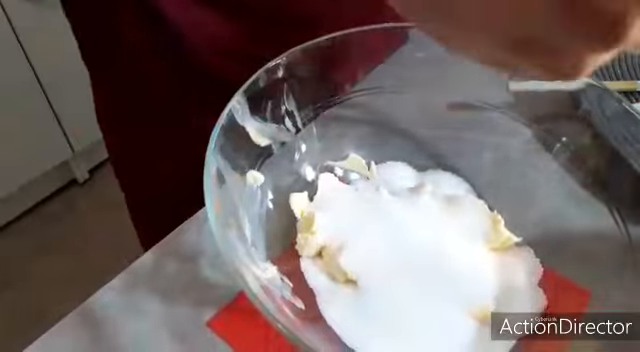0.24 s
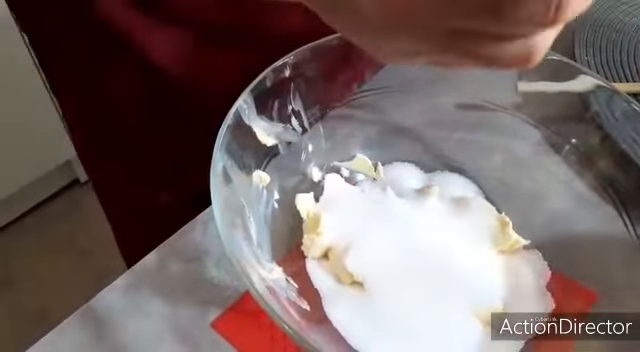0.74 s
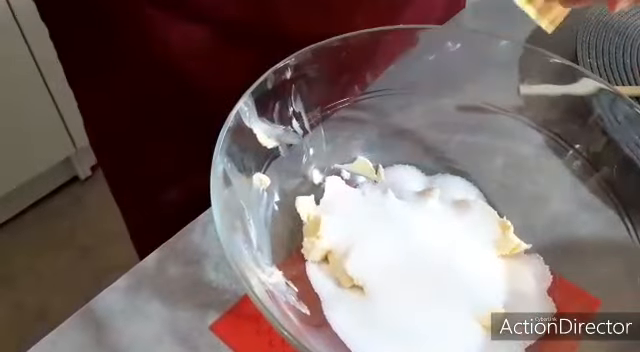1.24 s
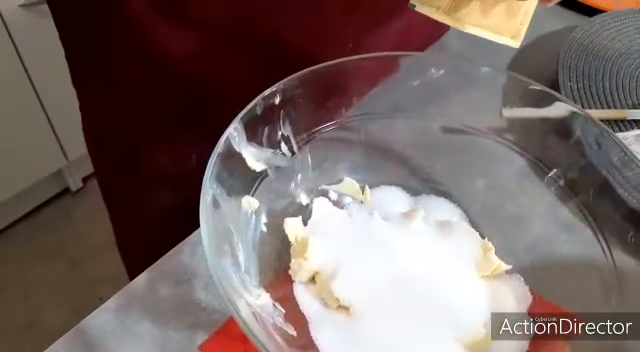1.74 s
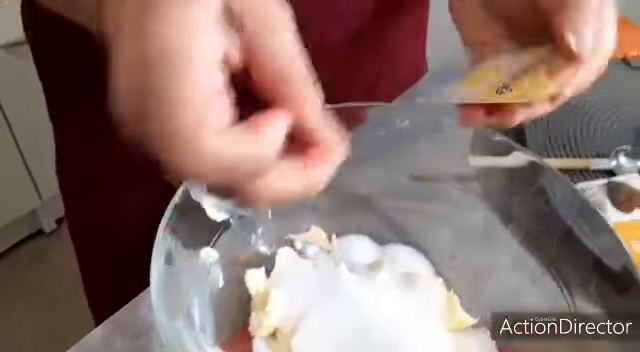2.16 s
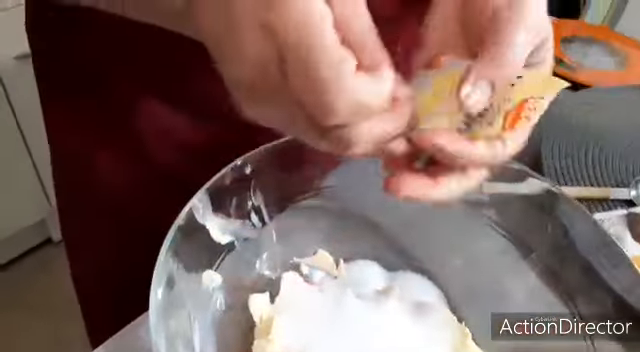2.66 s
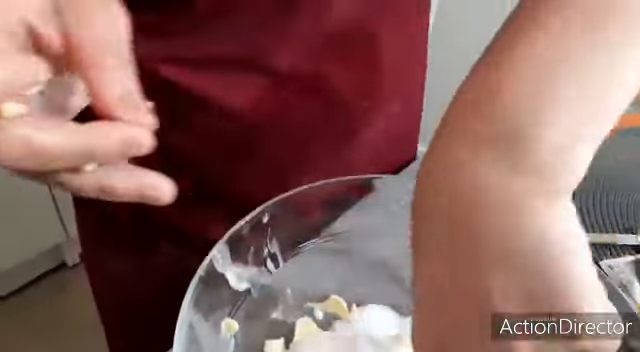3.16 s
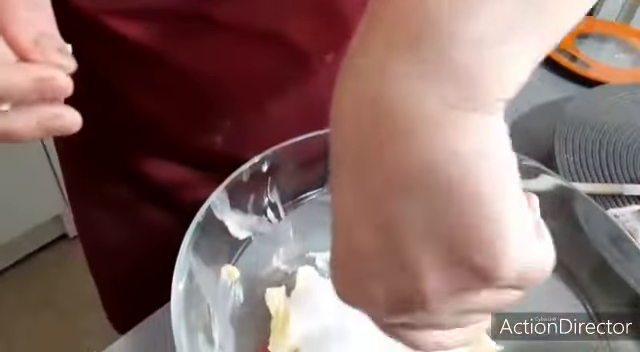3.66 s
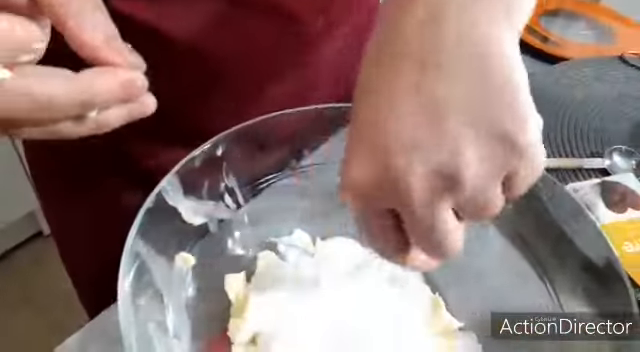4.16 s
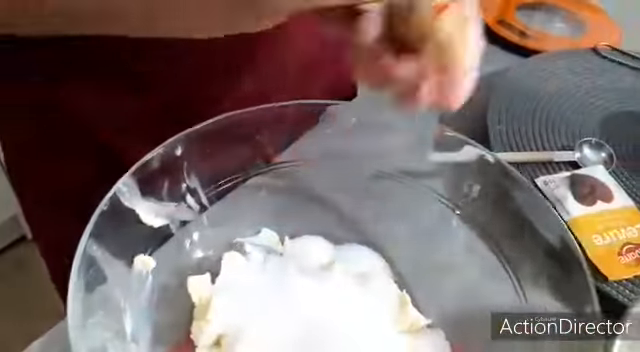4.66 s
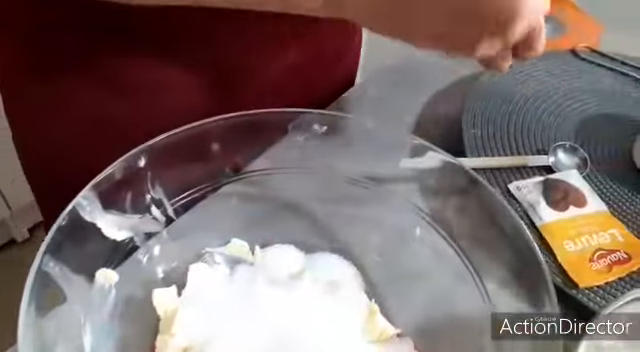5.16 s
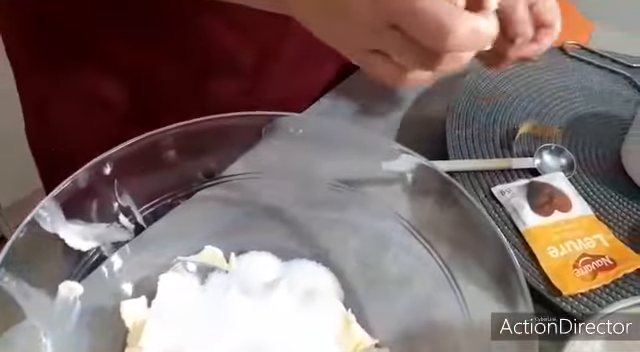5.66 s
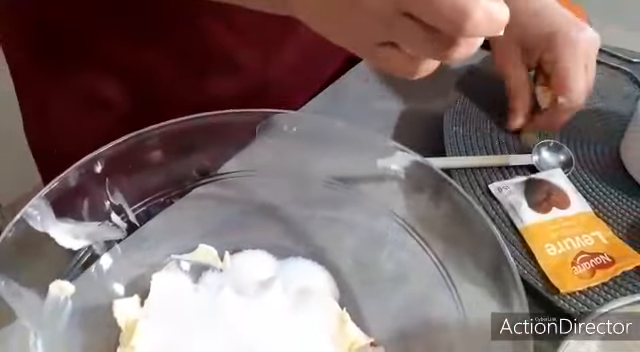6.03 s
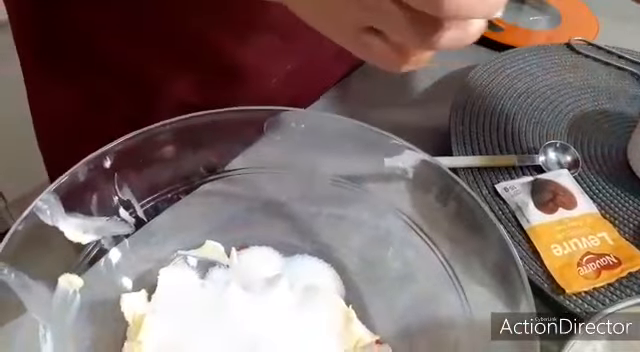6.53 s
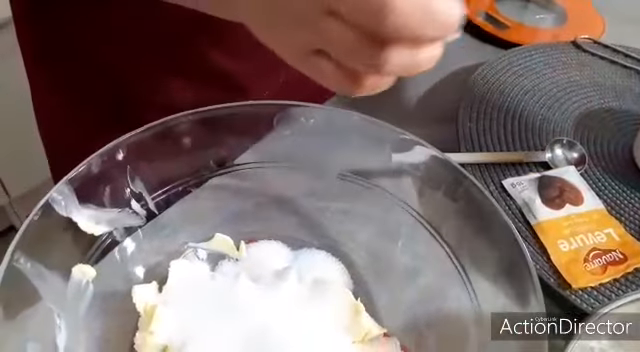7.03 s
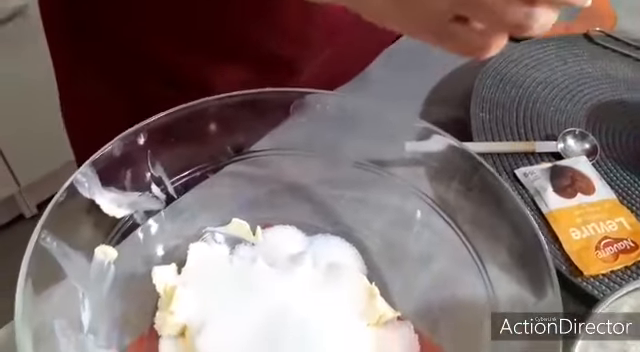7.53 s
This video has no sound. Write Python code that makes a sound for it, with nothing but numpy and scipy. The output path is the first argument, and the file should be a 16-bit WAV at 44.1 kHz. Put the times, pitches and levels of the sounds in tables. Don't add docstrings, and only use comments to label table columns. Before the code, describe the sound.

Sparse crisp snaps and a short tear open the scene, shifting toward the right. Sharper crackles and a grainy pouring rustle come back to centre, with small muted taps on a glass bowl. The loudest crumpling follows, then a lull, then another tight, bright crackling burst that thins to isolated ticks. Recorded a hand's width away in a small, quiet kitchen with faint hum.

```python
import sys
import numpy as np
from scipy import signal
from scipy.fft import rfft, irfft, next_fast_len
from scipy.io import wavfile
from scipy.ndimage import uniform_filter1d

SR = 44100
rng = np.random.default_rng(int(sys.argv[2]) if len(sys.argv) > 2 else 0)


def voltage_ratio(level):
    return 10 ** (np.asarray(level, float) / 20)


def digitize_waveform(pressure):
    field = np.atleast_2d(pressure).T
    bounded = np.clip(field, -1, 1)
    quanta = np.round(bounded * 32767).astype(np.int16)
    wavfile.write(sys.argv[1], SR, quanta)


N = 344024

TURN_SNAPS = [(.0063, -21.5, 2950, -6), (.0553, -25, 4640, -10), (.1524, -25.5, 1780, -2),
              (.2265, -30.5, 5860, 1), (.2785, -22, 1870, 1.5), (.2848, -17.5, 3100, -2.5),
              (.3513, -23.5, 3180, -.5), (.5069, -27.5, 6700, -13), (.5269, -25, 1670, .5),
              (.5847, -29, 2470, -2), (.8267, -39, 1820, -16.5), (.9764, -38, 2160, 2),
              (.994, -26, 7400, -1), (1.2095, -36, 1770, -11), (1.2995, -27, 2250, 3),
              (1.31, -19, 6850, -4), (1.3796, -33.5, 1750, -17.5), (1.4246, -42, 4650, 6),
              (1.4774, -29, 1850, 6), (1.6157, -32, 4670, 1.5), (1.7893, -26, 1060, .5),
              (1.924, -21.5, 5400, -9), (1.9393, -20, 8300, 1.5), (2.0069, -18.5, 1890, 3),
              (2.1817, -46.5, 1700, -21)]
POUR_SNAPS = [(2.6147, -16.5, 5900, 1), (2.697, -15, 3800, 1.5), (2.7272, -26, 2000, -10),
              (2.87, -31.5, 1940, -23), (2.8967, -27, 1890, -9), (3.022, -19, 7600, -4.5),
              (3.3246, -20, 2670, -16), (3.4036, -19.5, 1830, .5), (3.422, -12, 1860, -21),
              (3.429, -12, 1960, -1), (3.4904, -12.5, 2860, -3.5), (3.5096, -22, 1500, -6),
              (3.5296, -14, 1420, -10.5), (3.5635, -18, 1670, -3.5), (3.8565, -34.5, 2800, -7.5),
              (3.9879, -20, 5400, -7), (4.0894, -20.5, 2570, -3.5), (4.1016, -15.5, 1690, -8),
              (4.1154, -11.5, 4340, 5), (4.1966, -9, 7600, 6), (4.2214, -9, 7040, -2),
              (4.2266, -20, 1060, 0), (4.4056, -29, 4540, -7)]
CRUSH_SNAPS = [(4.4288, -15.5, 7860, -3), (4.4459, -12, 4430, -3), (4.514, -19, 1310, 1),
               (4.5248, -15, 5700, -4.5), (4.5468, -15, 3000, -4), (4.588, -21, 1240, -10),
               (4.6023, -23, 6400, 7), (4.6086, -17.5, 7600, -2), (4.6663, -13, 3480, -12),
               (4.6935, -20.5, 4630, -17.5), (4.7062, -9.5, 3440, -13), (4.715, -11, 3550, -8),
               (4.7628, -23, 8120, 11), (4.7721, -12.5, 8000, .5), (4.7793, -13, 5000, 3.5),
               (4.8068, -18, 2800, -20), (4.8429, -8.5, 7500, -3), (4.8522, -19.5, 7560, 8.5),
               (4.9018, -26, 1390, -2), (4.9223, -19.5, 5810, -12), (4.9399, -16, 3570, -2.5),
               (5.0399, -16, 1990, 5.5), (5.0906, -29, 1510, 7.5), (5.1265, -22, 1590, -21),
               (5.5022, -38.5, 2580, -2.5), (5.6616, -22, 7000, 1.5), (5.7225, -23, 1730, -24),
               (5.7451, -18.5, 1900, -.5), (5.7652, -23, 2024, 6), (5.7939, -17.5, 2420, 9)]
BALL_SNAPS = [(5.8146, -14, 5600, -6), (5.8667, -12, 5400, -8), (5.8895, -24.5, 5360, -3),
              (5.9507, -33.5, 3880, -3.5), (6.0793, -28, 7240, -8.5), (6.2335, -32, 3980, -20),
              (6.2672, -15.5, 4580, -15.5), (6.3246, -28, 5360, -4), (6.3412, -24, 6680, -14),
              (6.3796, -21, 7900, 3), (6.4726, -9.5, 4130, -.5), (6.5408, -11, 4630, -9.5),
              (6.5448, -5, 6600, -9.5), (6.570, -27, 4800, -17), (6.6359, -28, 4900, -5),
              (6.6495, -29, 4930, -7), (6.6745, -14.5, 4030, -16), (6.6898, -22.5, 1940, -4),
              (6.696, -13, 4850, -2.5), (6.726, -20.5, 6900, -4.5), (6.7781, -27, 9200, 3),
              (6.8248, -15, 2460, -14), (6.8885, -11.5, 2570, -10), (6.9211, -33.5, 7150, 16),
              (7.2412, -29.5, 3680, -32.5), (7.3493, -25, 3360, -7.5), (7.4552, -35.5, 3730, -13),
              (7.708, -41.5, 3800, 2), (7.721, -31, 5730, -2), (7.7436, -23, 2490, -19.5)]
TICKS = [(0.0461, -28, 3900, -6), (0.146, -42, 3510, 3), (0.2512, -36, 4410, -6),
         (0.3161, -23, 8830, 0), (0.3365, -25, 8380, -1), (0.3451, -24, 8230, 0),
         (0.4058, -39, 7880, -3), (0.4906, -36, 5250, -8), (0.6687, -48, 1550, -18),
         (0.697, -37, 2410, -4), (0.7247, -30, 4090, -5), (0.8549, -40, 1830, -19),
         (0.8994, -45, 2800, 4), (0.9212, -39, 2520, -5), (1.3954, -42, 1010, -18),
         (1.4321, -38, 1830, -9), (1.4653, -48, 2090, 0), (1.5021, -40, 1100, -19),
         (1.5143, -40, 2200, -21), (1.8881, -43, 2200, 1), (2.1338, -42, 1890, -24),
         (2.264, -52, 7990, 5), (2.2946, -53, 1250, -12), (2.4012, -33, 8680, -1),
         (2.4115, -32, 8760, -2), (2.4358, -42, 2820, 1), (2.4706, -26, 4970, -12),
         (2.4998, -41, 1180, -14), (2.5223, -27, 2840, -12), (2.5339, -30, 7520, -1),
         (2.5419, -33, 5770, -3), (2.5718, -31, 8010, -2), (2.6078, -26, 4460, 1),
         (2.668, -24, 3080, -11), (2.6849, -23, 1960, -19), (2.706, -23, 3960, -11),
         (2.8643, -35, 1920, -19), (2.8899, -34, 1830, -13), (2.9064, -23, 1870, -21),
         (2.9684, -34, 1400, -13), (2.9752, -29, 1290, -11), (2.9948, -34, 3620, -8),
         (3.0493, -33, 3550, -11),
         (3.9998, -30, 4870, 1), (4.0101, -38, 2800, 4), (4.0785, -26, 1420, -24),
               (4.1806, -32, 2130, -22), (4.2334, -20, 6070, -1), (4.3885, -35, 1790, -22),
               (4.4989, -25, 5620, -4), (4.6797, -23, 1010, -13), (4.7188, -19, 1360, 0),
               (4.7402, -27, 1250, -20), (4.8033, -23, 7410, -4), (4.8365, -26, 1790, 4),
               (4.8593, -19, 2410, 0), (4.8751, -24, 3510, 2), (4.915, -21, 3010, -8),
               (4.9365, -17, 1680, -9), (5.0201, -34, 1530, -17), (5.0284, -33, 7600, 0),
               (5.2073, -25, 3380, -15), (5.4442, -41, 2390, -21), (5.5843, -45, 1770, -15),
               (5.6199, -39, 1960, -20), (5.646, -31, 1920, -24), (5.7048, -38, 4570, 7),
               (5.748, -23, 2430, 7), (6.1409, -44, 4290, -3), (6.255, -33, 4950, -13),
               (6.3186, -35, 3380, -12), (6.3325, -30, 2150, -9), (6.3588, -38, 6350, 5),
               (6.3681, -29, 6780, -5), (6.3908, -32, 6760, -16), (6.453, -23, 7490, -8),
               (6.4764, -18, 4220, -11), (6.6669, -27, 4570, -13), (6.6806, -31, 3880, -24),
               (6.7066, -23, 5020, -8), (6.7586, -30, 3750, -2), (6.8303, -22, 5560, -13),
               (6.8977, -29, 4890, -9), (6.9097, -29, 8030, -5), (7.6513, -49, 5790, -1)]
# [low edge f/Hz, high edge f/Hz]
BANDS = [(350, 1250), (1250, 3000), (3000, 8000), (8000, 15600)]


def sachet():
    shape, rings = snaps(TURN_SNAPS + POUR_SNAPS + CRUSH_SNAPS + BALL_SNAPS)
    tick_shape, tick_rings = snaps(TICKS)
    rub = rustle()
    noise = paper_noise()
    rings = rings + crackle(uniform_filter1d(rub[1, 0] + rub[2, 0], size=300))
    shape = shape + voltage_ratio(-4) * tick_shape
    rings = rings + voltage_ratio(-1.5) * tick_rings

    bands = np.zeros((2, N))
    for gated, (low, high) in zip((shape + rub) * noise, BANDS):
        bands += keep(gated, (.85 * low, 1.06 * high), order=2)

    rumble = rng.standard_normal((2, N)) + rng.standard_normal(N)
    rumble = unit(keep(rumble, (60, 240), order=2))
    push = uniform_filter1d(rub[0] + .15 * shape[0], size=900)
    return bands + keep(rings, (1000, 16000)) + voltage_ratio(-17.5) * push * rumble


# [t/s, closed 0-1]
CLOSED = [(0, .1), (.7, .35), (1.12, .8), (1.22, .2), (1.55, .45), (2.0, .02), (2.5, .15), (2.7, .55),
          (3.0, .25), (3.33, .65), (3.45, .22), (3.97, .75), (4.06, .24), (4.7, .38), (5.1, .95),
          (6.85, .75), (7.66, .99), (7.72, .2)]
# [t/s, broad panels against tight creases level/dB, graininess 0-1]
GRIP = [(0, 2, .7), (.85, 5, .9), (1.6, -2, .8), (1.9, 9, .5), (2.05, 1.5, .5), (2.8, -2, .8), (3.0, 6, .7),
        (3.25, -7, .12), (3.5, 4, .7), (4.5, -3, .9), (5.25, 13, .4), (6.3, 0, .8), (6.62, -6, .9),
        (6.9, 6, .6), (7.13, -11, .25), (7.3, -9, .4), (7.68, -4, .4), (7.75, 4, .8)]


def snaps(creases):
    shape, rings, t = np.zeros((4, 2, N)), np.zeros((2, N)), np.arange(2000) / SR
    rise = 1 - np.exp(-t / 0.00038)
    burst = np.array([rise * (fade(t, t60) + 0.045 * fade(t, 0.081)) for t60 in (0.013, 0.012, 0.010, 0.0052)])
    closed_s, closed = np.transpose(CLOSED)
    grip_s, grip_db, _ = np.transpose(GRIP)
    for (s, db, hz, fine_db), luck in zip(creases, rng.random((len(creases), 5))):
        start, shift, spacing, offset, side = luck
        gain = voltage_ratio(db) * ports(7.6 * (side - .5))[:, None]
        octaves = np.log2(hz / 3000)
        low_db = -4 * octaves - 32 * np.interp(s, closed_s, closed)
        lean_db = 3.5 * octaves
        panel_db = -9.5 - lean_db + .6 * np.interp(s, grip_s, grip_db)
        band_db = np.array([low_db - 2.5, panel_db, -6.5 + min(lean_db, 0), fine_db - 0.5])
        add(shape, voltage_ratio(band_db)[:, None, None] * gain * burst[:, None], s)

        phase = 2 * np.pi * np.array([[start], [start + (shift - .5) / 2]])
        second_hz = hz * (1.15 + .5 * spacing)
        pair = np.sin(2 * np.pi * hz * t + phase)
        pair = pair + .5 * np.sin(2 * np.pi * second_hz * t + phase + 2 * np.pi * offset)
        ring = fade(t, .48 / np.sqrt(hz))
        add(rings, voltage_ratio(-1.5) * gain * rise * ring * pair, s)
    return shape, rings


def crackle(loudness, count=2600, size=224):
    when, pitch, ring, side, phase, strength = rng.random((count, 6)).T
    start = (when * (N - size)).astype(int)
    panel_db, grain = (column[start] for column in read(GRIP))
    hz = (1400 * 10 ** (pitch ** voltage_ratio(.5 * panel_db)))[:, None]
    t = np.arange(size) / SR
    gain = loudness[start] * grain * voltage_ratio(5 - 13 * np.log10(np.maximum(strength, .15)))
    t60 = (3.8 + 9 * ring[:, None]) / hz
    tick = np.sin(2 * np.pi * (hz * t + phase[:, None]))
    tick = tick * (1 - np.exp(-t / 0.00023)) * fade(t, t60)
    where = (start[:, None] + np.arange(size)).ravel()
    heard = []
    for port_gain in ports(17 * (side - .5)):
        heard.append(np.bincount(where, (tick * (gain * port_gain)[:, None]).ravel(), N))
    return np.array(heard)


def rustle():
    effort = movement()
    low_db = -25 * read(CLOSED)[0] - .42 * (20 * np.log10(effort) + 52)
    fine_db = read([(3.4, 2), (3.45, -7.5), (7.02, -7.5), (7.08, -2.5)])[0]
    panel_db, grain = read(GRIP)
    common = effort * grains(90, 2.5, .06, .3 * grain)
    own = [grains(rate, 3.2, 5.5 / rate, 0.83 * grain) for rate in (152, 203, 252, 328)]
    band_db = [low_db - 1, panel_db / 2 - 6.5, -panel_db / 2 - 1, fine_db - .3 * panel_db]
    return np.array([voltage_ratio(db) * common * g for db, g in zip(band_db, own)])[:, None]


# [peak t/s, rustle level/dB, swell/s per 20 dB, fade/s per 20 dB]
STROKES = [(0.0, -52, .1, .5), (.299, -42, .04, .12), (.725, -47.5, .06, .09), (.05, -47, .008, .09),
           (.8, -57, .1, .2), (.9, -54, .03, .11), (1.06, -62, .1, .2), (4.7, -36, .06, .08),
           (5.66, -52, .01, .08), (2.67, -44, .02, .03), (7.51, -62, .01, .12), (.99, -51, .08, .11),
           (1.63, -67, .045, .1), (2.111, -66, .02, .14), (2.27, -68, .012, .3), (2.525, -47, .015, .08),
           (2.612, -37, .04, .07), (2.7, -40, .06, .07), (2.89, -49, .22, .4), (3.519, -40.5, .07, .09),
           (3.87, -61, .056, .12), (4.001, -45.5, .025, .13), (4.109, -26.5, .03, .04),
           (4.221, -32, .02, .06), (4.931, -34, .3, .085), (5.05, -37.5, .05, .075), (5.23, -41, .045, .2),
           (5.385, -52.5, .08, .07), (5.811, -41.5, .245, .155), (6.69, -42, .065, .062),
           (6.825, -43, .06, .05), (6.909, -46, .022, .095), (7.145, -58, .015, .1),
           (7.35, -48.5, .05, .085), (7.66, -58, .07, .06), (7.74, -45.5, .03, .16)]
# [t/s, rustle level/dB, swell/s per 20 dB, fade/s per 20 dB, hold/s]
DRAGS = [
    (.49, -53, .005, .05, .14),
    (1.22, -67, .19, .11, .28),
    (1.8, -55.5, .021, .3, .08),
    (1.925, -32, .025, .04, .14),
    (2.401, -53, .004, .11, .09),
    (3.171, -46.5, .25, .15, .14),
    (4.28, -51, .05, .21, .11),
    (4.52, -41.5, .25, .21, .26),
    (6.47, -44.5, .36, .11, .09),
    (7.42, -66, .21, .11, .21),
]


def movement():
    t, power = np.arange(0, N, 32) / SR, 1e-12
    for s, db, swell, fall, *hold in STROKES + DRAGS:
        before = (s - t) / swell
        after = (t - s - sum(hold)) / fall
        away = np.maximum(np.maximum(before, after), 0)
        power = power + voltage_ratio(db - 20 * away) ** 2
    return np.interp(np.arange(N) / SR, t, np.sqrt(power))


def grains(rate, spread_db, t60, share):
    chance = rng.random(N)
    size = np.minimum(rng.exponential(size=N), 2.2)
    slips = (chance < rate / SR) * voltage_ratio(spread_db * size)
    rough = unit(signal.lfilter([1], [1, -fade(1 / SR, t60)], slips))
    return np.sqrt(1 - share + share * rough ** 2)


ALIKE = [0.83, .5, 0.41, .1]
# [f/Hz, level/dB per Hz]
PAPER = [(120, -40), (200, -14.5), (335, -11.5), (562, -19.5), (640, -12.5), (860, -14), (1830, 1),
         (10400, 3), (12300, 4), (15200, 5), (16200, -40)]


def paper_noise():
    out = []
    for edges, alike in zip(BANDS, ALIKE):
        shared, own = rng.standard_normal(N), rng.standard_normal((2, N))
        mixed = np.sqrt(alike) * shared + np.sqrt(1 - alike) * own
        out.append(unit(keep(colour(mixed, PAPER), edges)))
    noise = np.array(out)
    drumming = signal.lfilter(*signal.iirpeak(1795, 7, SR), noise[1])
    noise[1] = unit(noise[1] + 0.38 * drumming)
    return noise


# [t/s, peak level/dB, upper modes level/dB]
KNOCKS = [(0.002, -39.5, -19), (0.351, -41, -20), (3.023, -40, -18), (3.402, -52, 8.5), (3.421, -35, -0.5),
          (3.508, -31.5, 2.5), (3.53, -42, 10), (3.563, -49, 9.5), (5.499, -64, 5), (6.034, -73, 14.5),
          (6.106, -68, 10.5), (6.122, -72, 10), (6.153, -72, 11), (6.268, -62, -21), (6.545, -60, -21),
          (.285, -46, -10), (.585, -48, -15), (4.7, -46, -5), (6.37, -58, -21), (6.47, -57, -21),
          (2.53, -50, -21), (7.744, -45.5, -21)]
# [f/Hz, level/dB, t60/s]
BOWL = [(270, -14.5, 0.17), (337, -4, 0.1), (400, -8, .04), (485, 2, 0.023), (610, -2, .05), (650, 3, 0.06),
        (700, -2, .05), (790, -1, .04), (1060, -6, .04), (1440, -15, 0.09), (1855, -15, 0.17),
        (2620, -13, .09)]


def bowl():
    out, t = np.zeros(N), np.arange(12000) / SR
    hz, db, t60 = np.transpose(BOWL)[:, :, None]
    upper = np.arange(len(BOWL))[:, None] > 3
    for s, hit_db, upper_db in KNOCKS:
        luck, detune = rng.standard_normal((2, len(BOWL), 1))
        strength = voltage_ratio(hit_db + 4 + db + upper * upper_db + 2.2 * luck)
        modes = strength * fade(t, t60) * np.sin(2 * np.pi * hz * (1 + 0.015 * detune) * t)
        thud = unit(keep(rng.standard_normal(len(t)), (260, 950), order=2))
        thud = voltage_ratio(hit_db + max(upper_db, 0) - 6) * fade(t, .05) * thud
        add(out, (1 - np.exp(-t / 0.0019)) * (modes.sum(axis=0) + thud), s)
    return keep(out, (200, 9000), order=2)


# [t/s, peak level/dB, f/Hz]
BUMPS = [
    (0.03, -55, 56.5),
    (2.071, -68.5, 88.8),
    (6.121, -67, 67.3),
    (3.42, -67, 80.),
    (3.53, -66, 65.),
    (6.36, -71, 215.),
    (6.48, -70, 60.),
    (2.53, -68, 80.),
    (7.449, -67, 108),
]


def bumps():
    out, t = np.zeros(N), np.arange(9000) / SR
    for s, db, hz in BUMPS:
        envelope = (1 - np.exp(-t / 0.0049)) * fade(t, 0.17)
        add(out, voltage_ratio(db + 7.5) * envelope * np.sin(2 * np.pi * hz * t), s)
    return out


def room(dry):
    t = np.arange(16000) / SR
    tail = rng.standard_normal((2, len(t))) * fade(t, .23) * (1 - np.exp(-t / 0.0013))
    tail = signal.lfilter([1], [1, -.4], tail)
    tail = unit(tail) / np.sqrt(len(t))
    return voltage_ratio(-12) * signal.fftconvolve(dry.mean(axis=0)[None], tail, axes=1)[:, :N]


# [f/Hz, level/dB per Hz]
KITCHEN = [(15, -58.5), (25, -28), (43, -7.5), (108, -2), (190, 1), (229, 1.5), (256, -12.5), (335, 5.5),
           (427, -11), (624, -13), (988, -20), (2910, -28), (15400, -21), (16000, -45)]


def kitchen():
    shared, own = rng.standard_normal(N), rng.standard_normal((2, N))
    hum = unit(colour(own + 1.2 * keep(shared, (70, 900), order=1), KITCHEN))
    waver = keep(hum, (20, 150), order=1) * (voltage_ratio(2.5 * drift(4)) - 1)
    waver = waver + keep(hum, (150, 500), order=1) * (voltage_ratio(2.5 * drift(6)) - 1)
    return voltage_ratio(-73.5) * (hum + waver)


def drift(rate):
    k = int(SR / rate)
    steps = np.repeat(rng.standard_normal(N // k + 1), k)
    return unit(uniform_filter1d(steps, k)[:N])


def unit(x):
    return x / np.sqrt(np.mean(x ** 2))


def colour(x, table):
    size = next_fast_len(N)
    hz = np.maximum(np.arange(size // 2 + 1) * SR / size, 1)
    table_hz, table_db = np.transpose(table)
    gain = voltage_ratio(np.interp(np.log(hz), np.log(table_hz), table_db))
    return irfft(rfft(x, size) * gain, size)[..., :N]


def keep(x, edges, order=3):
    return signal.sosfilt(signal.butter(order, edges, "bandpass", fs=SR, output="sos"), x)


def fade(t, t60):
    return np.exp(-np.log(1000) * t / t60)


def add(track, sound, s):
    i = max(int(s * SR), 0)
    track[..., i:i + sound.shape[-1]] += sound[..., :N - i]


def ports(db):
    return voltage_ratio(np.array([db, -db]) / 2)


def read(table):
    s, *columns = np.transpose(table)
    return [np.interp(np.arange(N) / SR, s, c) for c in columns]


# [t/s, left port lag/ms, left minus right level/dB]
PLACE = [
    (0, 0.31, 1),
    (.7, 0.11, -8.5),
    (1.3, 0.069, -13.5),
    (2.001, .03, -3.5),
    (2.6, .03, 3),
    (3.401, 0.063, 0.5),
    (4.45, -0.085, 2),
    (6.201, .09, 1),
    (6.602, 0.28, 0.5),
    (7.8, 0.32, 1),
]


def scene():
    lag_ms, pan_db = read(PLACE)
    near = ports(pan_db) * sachet() + bowl()
    delayed = np.arange(N) - np.round(lag_ms * SR / 1000).astype(int)
    near[0] = near[0, np.clip(delayed, 0, N - 1)]
    return near + room(near) + bumps() + kitchen()


def low_pass(x):
    return signal.sosfilt(signal.butter(12, 16800, fs=SR, output="sos"), x)


def record(dry):
    rolloff = signal.butter(10, 16000, fs=SR, output="sos")
    mix = signal.sosfilt(rolloff, dry)
    return low_pass(mix)


dry = scene()
out = record(dry)
digitize_waveform(out)
```